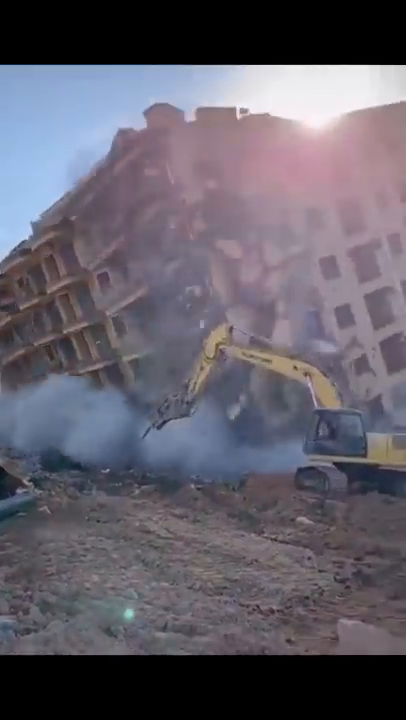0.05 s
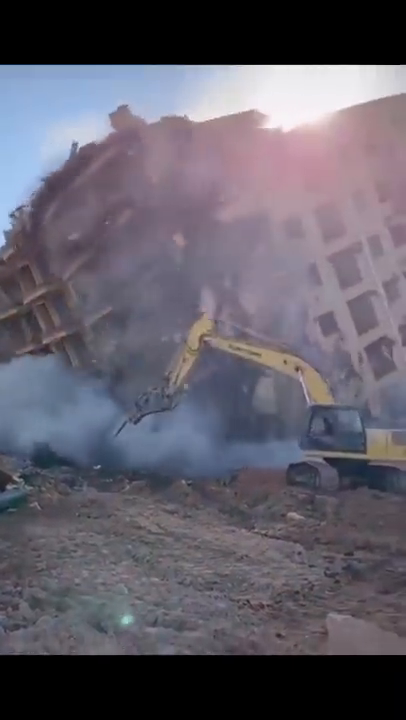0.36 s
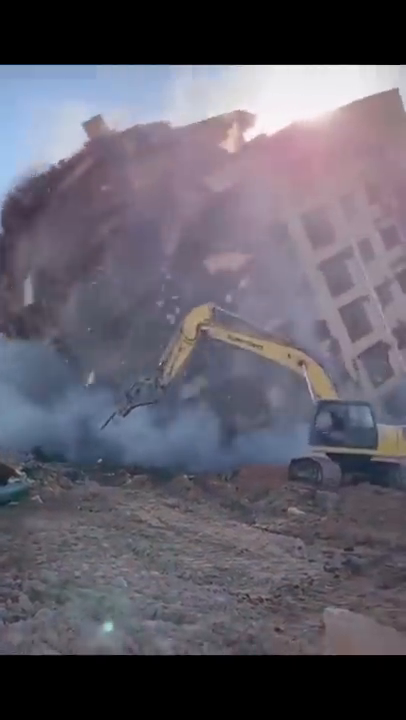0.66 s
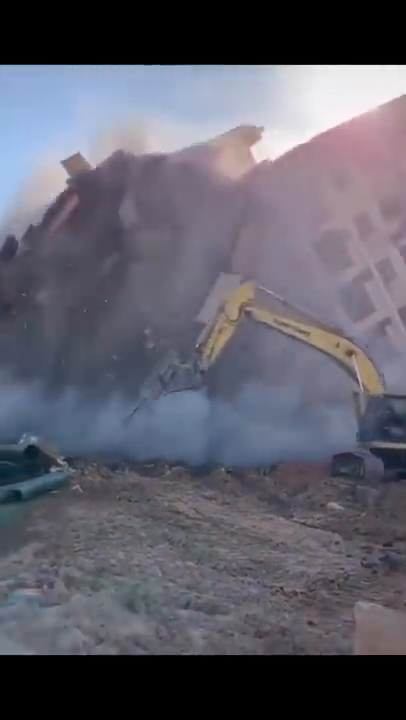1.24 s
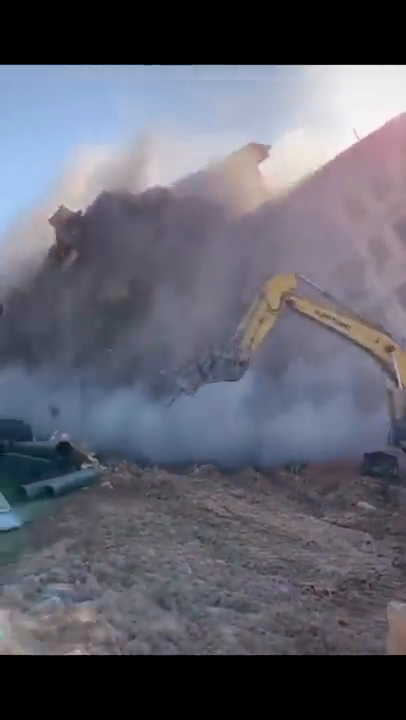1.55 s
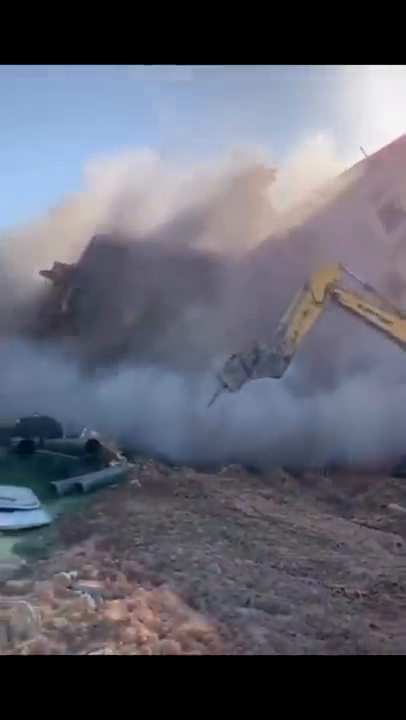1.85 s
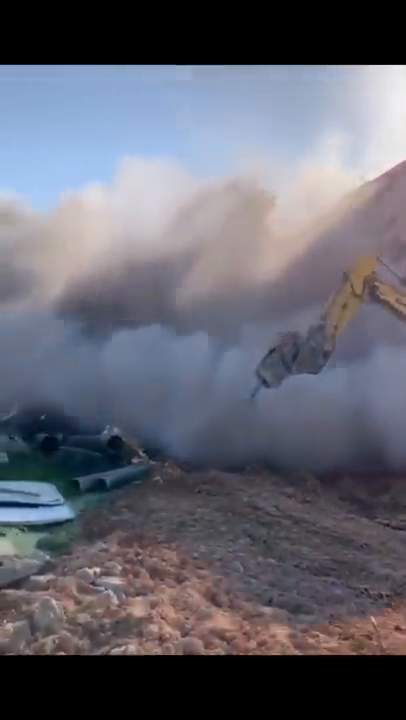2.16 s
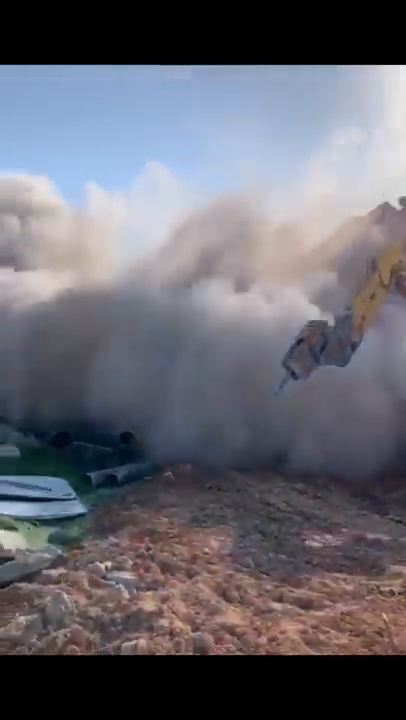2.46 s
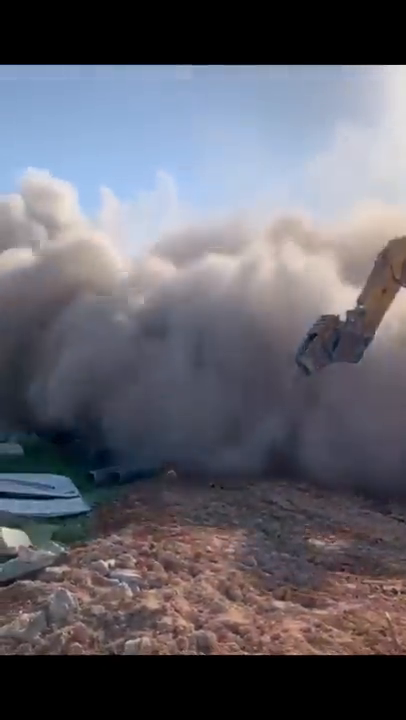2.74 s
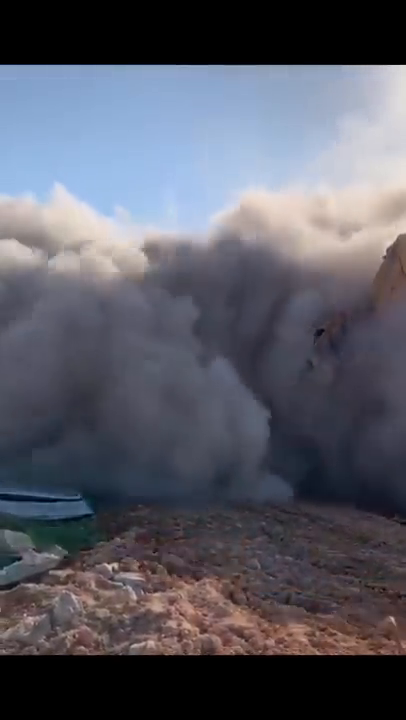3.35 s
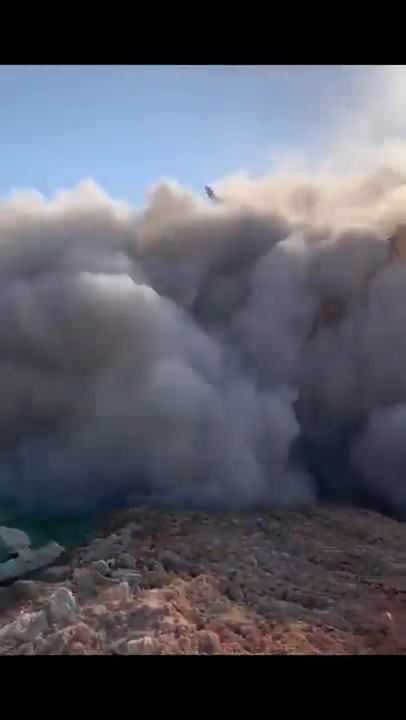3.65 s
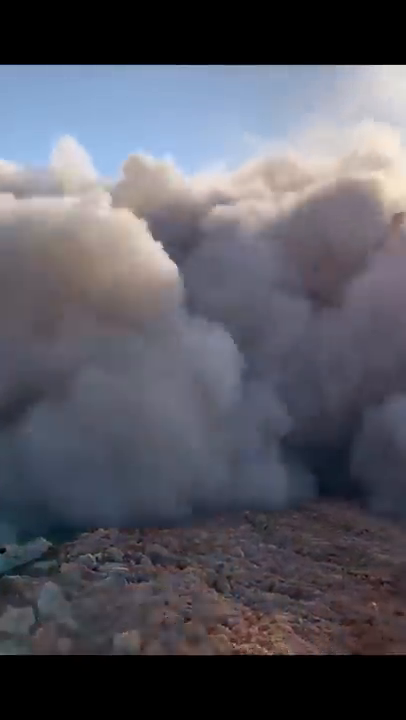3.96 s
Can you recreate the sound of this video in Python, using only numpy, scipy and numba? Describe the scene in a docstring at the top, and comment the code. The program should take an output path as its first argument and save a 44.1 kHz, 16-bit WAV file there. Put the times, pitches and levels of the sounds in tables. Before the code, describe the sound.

A concrete building collapses some distance away on an open site, already roaring at the start. Bricks clatter, grit hisses and rubble spills in surges while heavy slabs thud on the ground, strongest at about 1 to 1.7 seconds. After another surge near 2.4 seconds, the rumble dies down toward 4 seconds with weaker thuds. A faint, low excavator drone fades underneath.

```python
"""A gutted concrete block collapses on an open site, heard from some distance.
Countless slabs, blocks, bricks and bits of grit strike each other and merge into a roar
that dies away as the heap settles. Floors spill rubble in surges, big slabs thump the ground,
and an excavator drones underneath."""
import sys
import numpy as np
from scipy import signal
from scipy.fft import rfft, irfft
from scipy.io import wavfile
from scipy.ndimage import uniform_filter1d
from numba import njit

SR = 44100
rng = np.random.default_rng(int(sys.argv[2]) if len(sys.argv) > 2 else 0)


def log_audio(samples):
    """Write samples as a 16-bit WAV file to the path given in sys.argv[1]."""
    # one column per channel
    frames = np.atleast_2d(samples).T
    # limit to full scale, then quantise
    limited = np.clip(frames, -1, 1)
    pcm = np.round(limited * 32767).astype(np.int16)
    wavfile.write(sys.argv[1], SR, pcm)


N = 176400

# How loud each size of debris is as it falls (time [s], relative level [dB])
SLAB_LEVELS = [(0, -24), (.7, -19.5), (1.15, -21.5), (1.32, -19.5), (1.43, -20.5), (1.8, -21.5),
               (2.28, -25), (2.38, -21), (2.56, -23), (2.8, -25), (3.02, -22), (3.33, -25.5), (3.4, -28),
               (3.76, -26.5), (4, -36.5)]
BLOCK_LEVELS = [(0, -16), (.12, -16.5), (.18, -20), (.4, -22), (.7, -20), (1.28, -18.5), (1.345, -21.5),
                (1.42, -20), (1.68, -19.5), (1.9, -21), (2.29, -26.5), (2.35, -20.5), (2.6, -21),
                (2.8, -27.5), (3.2, -27.5), (3.5, -31.5), (3.8, -31), (3.87, -36.5), (4, -35)]
MASONRY_LEVELS = [(0, -20), (.3, -21), (1.5, -20), (1.62, -22), (2.25, -23), (2.42, -21.5), (2.75, -27),
                  (3.17, -27), (3.35, -30.5), (3.58, -33.5), (3.65, -33), (4, -35.5)]
BRICK_LEVELS = [(0, -19.5), (.6, -20.5), (1.2, -21), (1.58, -19), (1.8, -24), (2.2, -23.5), (2.4, -26),
                (2.5, -24.5), (2.8, -29), (3.15, -27.5), (3.3, -31), (3.65, -34.5), (4, -36.5)]
GRIT_LEVELS = [(0, -32), (.7, -32), (.82, -31.5), (1.45, -30.5), (1.53, -29.5), (1.6, -32), (1.78, -32),
               (2.0, -33.5), (2.25, -36), (2.42, -36), (2.62, -33), (2.85, -38.5), (3.2, -37),
               (3.28, -41.5), (3.33, -39.5), (3.38, -40), (3.55, -41.5), (3.83, -44), (4, -47.5)]
# The tone of the debris, from bass to treble (frequency [Hz], relative level [dB])
DEBRIS_TONE = [(15, -41), (25, -8.5), (43, -1), (60, 1), (75, 0), (110, -3), (145, -6), (185, -7.5),
               (223, -11), (275, -11), (335, -10.5), (410, -14.5), (500, -12), (680, -12), (848, -16),
               (1050, -15), (1210, -16.5), (1420, -14.5), (1530, -13), (1700, -17), (1900, -17.5),
               (2250, -18), (2650, -21), (3070, -23.5), (3540, -28), (4280, -30), (4940, -36.5),
               (6260, -29.5), (7400, -29), (9620, -71.5), (16300, -120)]
# Spills of rubble (start [s], length [s], crumble [dB], crunch [dB], chips [dB], grit [dB])
RUBBLE_SPILLS = [(0.003, 0.027, -20.5, -25.5, -32, -37.5), (0.056, 0.025, -24, -22, -29, -36),
                 (0.16, 0.025, -21, -24.5, -31.5, -38), (0.311, 0.018, -21, -26.5, -30.5, -32.5),
                 (0.37, .04, -25.5, -24.5, -28.5, -40.5), (0.491, 0.025, -18.5, -23.5, -27, -32),
                 (0.661, 0.063, -29, -26, -29, -35.5), (0.856, 0.031, -25.5, -20, -20, -30),
                 (0.96, 0.036, -32, -28.5, -30, -31), (1.122, 0.038, -25.5, -21.5, -31, -37),
                 (1.214, 0.017, -24, -25, -29, -32.5), (1.287, 0.023, -23, -21, -27.5, -29),
                 (1.364, 0.017, -26, -24, -22, -34), (1.435, .03, -22, -27.5, -32.5, -33.5),
                 (1.466, 0.069, -29, -25, -28.5, -29), (1.614, 0.025, -28, -25.5, -28.5, -30.5),
                 (1.67, .015, -21.5, -24.5, -35.5, -41), (1.862, 0.053, -30.5, -26.5, -32, -36.5),
                 (1.991, 0.034, -25, -25, -26, -47.5), (2.301, 0.04, -26, -22, -25, -33),
                 (2.368, 0.04, -25, -21.5, -28, -30.5), (2.875, 0.091, -33.5, -35.5, -36.5, -36.5),
                 (3.087, 0.077, -31.5, -33, -33.5, -39.5), (3.207, 0.02, -28.5, -32.5, -32.5, -33),
                 (3.434, 0.047, -37, -39.5, -39.5, -40.5), (3.545, 0.019, -28.5, -34.5, -35.5, -45),
                 (3.814, .02, -40, -37.5, -42.5, -45), (3.903, 0.035, -42.5, -34.5, -47, -54.5)]
# Heavy pieces landing (time [s], pitch [Hz], relative level [dB], ring length [cycles])
LANDINGS = [(0.003, 290, -12.5, 1.8), (0.018, 191, -5, 2.6), (0.057, 175, -6.5, 2.3),
            (0.098, 85, -6.5, 1.3), (0.228, 70, -15, 1), (0.246, 183, -14.5, 2.7), (0.372, 86, -11, .7),
            (0.437, 180, -10, 2), (0.49, 178, -12, 2.3), (0.556, 215, -11, 1.5), (0.689, 57, -12, 1.8),
            (0.805, 60, -13, 1.3), (0.836, 272, -11.5, 2), (0.926, 161, -16, 1.5), (0.95, 59.5, -12, 1.5),
            (0.997, 213, -8, 1.5), (1.036, 88, -6, 1.7), (1.063, 170, -10, 1.5), (1.15, 201, -14.5, 2.8),
            (1.215, 96, -10.5, 2.6), (1.272, 120, -4.5, 2), (1.314, 79.5, -5.5, 1), (1.385, 103, -1, .8),
            (1.465, 105, -10, 1.1), (1.48, 36, -16.5, 1.8), (1.545, 215, -14, 2), (1.615, 134, -8, 1.6),
            (1.645, 130, -9.5, 2), (1.698, 164, -11.5, 2.4), (1.785, 72, -14, 1.8), (1.83, 165, -13, 1.5),
            (1.88, 55, -15, 2), (2.036, 108, -4.5, 0.45), (2.176, 62, -11.5, 1.8), (2.329, 95, -8, 1.2),
            (2.39, 44, -14, 2.1), (2.368, 82.5, -16, 1.5), (2.431, 78, -7.5, 0.97), (2.471, 171, -14, 1.8),
            (2.52, 148, -14.5, 2), (2.614, 94.5, -6, 0.55), (2.693, 120, -7.5, 0.64),
            (2.813, 143, -19, 1.5), (2.96, 41, -18, 2.4), (3.18, 105, -9, 1.2), (3.25, 69, -12.5, 1),
            (3.32, 65, -15, .9), (3.47, 162.4, -21.5, 1.8), (3.55, 150, -20.5, 1.9), (3.675, 130, -21, 1.9),
            (3.799, 79.8, -18, 0.99)]
# The tones of a bending slab (frequency [times its pitch], relative level [dB])
SLAB_TONES = [(1.001, 0), (1.9, -7.5), (3.4, -15.5)]
# The tones of the exhaust (frequency [times the firing rate], relative level [dB])
EXHAUST_TONES = [(1, -2), (2, -8.5), (3, -17.5)]
# Echoes off the ground, the machine and nearby heaps (delay [s], relative level [dB])
ECHOES = [(.0047, -20.5), (0.0112, -16), (0.0213, -19.5), (.034, -20.5)]


def collapse():
    """Five sizes of debris fall, from booming slabs to hissing grit; light pieces land in clumps."""
    slabs = steady(debris(24, 121.5, count=1500, spread_db=1.1, cycles=1.1), span_s=.07, share=.65)
    blocks = steady(debris(120, 351, count=1400, spread_db=2, cycles=1.7), span_s=.059, share=.65)
    masonry = steady(debris(355.7, 1098, count=4000, spread_db=1.97, cycles=8.9), span_s=.097, share=.64)
    bricks = steady(debris(1101.7, 3514, count=6000, spread_db=2, cycles=15), span_s=.08, share=.5)
    grit = steady(debris(3500, 7600, count=9000, spread_db=2.5, cycles=64), span_s=.12, share=.8)
    clumps_per_s = 40
    clumps = wander(count=int(clumps_per_s * N / SR))
    return (gain(.5) * slabs * level_curve(SLAB_LEVELS)
            + gain(-.36) * blocks * level_curve(BLOCK_LEVELS)
            + gain(-1 + .28 * clumps) * masonry * level_curve(MASONRY_LEVELS)
            + gain(-1.18 + .45 * clumps) * bricks * level_curve(BRICK_LEVELS)
            + gain(-1.44 + .8 * clumps) * grit * level_curve(GRIT_LEVELS))


def debris(low_hz, high_hz, count, spread_db, cycles):
    """Many hits of random time, pitch and size; each leaves a short, blurred echo on the site."""
    when, pitch, luck, ring_length = rng.random((count, 4)).T
    hz = .7 * low_hz + pitch * (1.3 * high_hz - .7 * low_hz)
    size = gain(-spread_db * np.log(np.maximum(luck, .01))) * np.sqrt(hz)  # a few hits stand out
    size *= rng.choice([-1., 1.], count)
    ring_cycles = np.clip(cycles, .2, 200) * (.5 + ring_length)
    hits = debris_band(ring(when, hz, size, ring_cycles), low_hz, high_hz)
    echo_s, echo_db = .2, -4  # the echo fades by 60 dB in echo_s
    fade = np.exp(-2 * np.log(1000) * np.arange(N) / SR / echo_s)
    lingering = np.sqrt(np.abs(irfft(rfft(hits ** 2) * rfft(fade), N)))
    echo = lingering * debris_band(rng.standard_normal(N), low_hz, high_hz)
    return normalize(hits + gain(echo_db) * normalize(echo))


@njit
def ring(when, hz, size, cycles):
    """Each struck piece rings with one tone, fading to about a third in the given cycles."""
    out = np.zeros(N)
    for k in range(len(when)):
        life = cycles[k] * SR / hz[k]
        step = np.exp(2j * np.pi * hz[k] / SR - 1 / life)  # one sample of turning and fading
        vibration = size[k] + 0j
        first = int(when[k] * N)
        for i in range(first, first + int(5 * life)):
            out[i % N] += vibration.imag
            vibration *= step
    return out


def debris_band(x, low_hz, high_hz):
    """Give a sound the tone of the debris and keep the part between two frequencies."""
    f = np.arange(N // 2 + 1) * SR / N + 1e-3
    hz, db = np.array(DEBRIS_TONE).T
    tone = gain(np.interp(np.log(f), np.log(hz), db))
    band = 1 / np.sqrt((1 + (low_hz / f) ** 12) * (1 + (f / high_hz) ** 12))
    return normalize(irfft(rfft(x) * tone * band, N))


def steady(x, span_s, share):
    """Debris falls in an unbroken stream: smooth out a share of its chance swells."""
    power = uniform_filter1d(x ** 2, int(span_s * SR), mode="wrap")
    return normalize(x / np.maximum(power, 1e-9) ** (share / 2))


def surges():
    """A floor gives way: crumbling masonry, crunching brick, chips and grit swell and run out."""
    crumble = steady(debris(304, 1000, count=3000, spread_db=1, cycles=4.4), span_s=.023, share=.8)
    crunch = steady(debris(900, 2100, count=4000, spread_db=1.7, cycles=7), span_s=.033, share=.8)
    chips = steady(debris(2000, 3500, count=5000, spread_db=1.8, cycles=7.3), span_s=.03, share=.98)
    grit = steady(debris(3400, 7600, count=8000, spread_db=1, cycles=9), span_s=.03, share=.8)
    rise_s, fade_s = .012, .018
    out = np.zeros(N)
    for start, length, crumble_db, crunch_db, chips_db, grit_db in RUBBLE_SPILLS:
        age = np.arange(N) / SR - start
        swell = np.clip(age / rise_s, 0, 1) * np.exp(-np.maximum(age - length, 0) / fade_s)
        out += swell * (gain(crumble_db) * crumble + gain(crunch_db) * crunch
                        + gain(chips_db) * chips + gain(grit_db) * grit)
    return out


def thumps():
    """Each heavy piece lands and thuds for a few cycles; its higher tones die sooner."""
    rise_cycles = .3
    out = np.zeros(N)
    for start, hz, db, cycles in LANDINGS:
        first = int(start * SR)
        age = np.arange(min(SR // 4, N - first)) / SR
        for multiple, tone_db in SLAB_TONES:
            turns = age * hz * multiple
            swell = (1 - np.exp(-turns / rise_cycles)) * np.exp(-turns / cycles)
            tone = swell / swell.max() * np.sin(2 * np.pi * turns)
            out[first:first + len(age)] -= gain(db + tone_db) * tone
    return out * gain(-1.5)


def clinks():
    """Hard stone and steel bars ring on for longer among the bricks."""
    return gain(-8.5) * debris(900, 4600, count=700, spread_db=3.5, cycles=74) * level_curve(BRICK_LEVELS)


def excavator():
    """A low, wavering drone, likely the diesel engine, fades as the listener backs away."""
    firing_hz, start_db, half_level_s = 56.7, -28, 2.7
    t = np.arange(N) / SR
    wavering_hz = firing_hz * (1 + .029 * wander(count=40))
    phase = 2 * np.pi * np.cumsum(wavering_hz) / SR
    drone = sum(gain(db) * np.sin(multiple * phase) for multiple, db in EXHAUST_TONES)
    return normalize(drone) * gain(start_db) / (1 + (t / half_level_s) ** 4)


def add_echoes(x):
    """Nearby surfaces send back echoes that shift as the listener moves; the overall level is kept."""
    t = np.arange(N) / SR
    echoes = np.zeros(N)
    for delay, db in ECHOES:
        drifting_delay = delay * (1 + .08 * wander(count=7))
        echoes += gain(db) * np.interp(t - drifting_delay, t, x, left=0)
    return normalize(x + echoes) * np.std(x)


def wander(count):
    """A line that drifts through count random values, mostly between -1 and 1."""
    return 1.2 * np.interp(np.arange(N), np.linspace(0, N, count), rng.standard_normal(count))


def level_curve(rows):
    """Join (time [s], level [dB]) points into a volume curve."""
    times, db = np.array(rows).T
    return gain(np.interp(np.arange(N) / SR, times, db))


def gain(db):
    """Turn decibels into a number to multiply by."""
    return 10 ** (np.asarray(db) / 20)


def normalize(x):
    """Scale a sound to an average (rms) level of 1."""
    return x / np.sqrt(np.mean(x ** 2) + 1e-18)


def scene():
    """The collapse with its clinks, surges and thumps, over the excavator, in one channel."""
    rubble = add_echoes(collapse() + clinks() + surges())
    return (rubble + thumps() + excavator())[None]


def record(dry):
    """The microphone has a dip in the treble, rounds the biggest peaks and cuts the highest sounds."""
    dip_hz, dip_width_hz, dip_db = 4980, 130, -9
    peak_limit, top_hz = .8, 7600
    f = np.arange(N // 2 + 1) * SR / N
    dip = gain(dip_db * np.exp(-((f - dip_hz) / dip_width_hz) ** 2))
    dipped = irfft(rfft(dry) * dip, N)
    rounded = dipped / (1 + (dipped / peak_limit) ** 6) ** (1 / 6)
    return signal.sosfilt(signal.ellip(12, .1, 80, top_hz, fs=SR, output="sos"), rounded)


dry = scene()
out = record(dry)
log_audio(out)
```